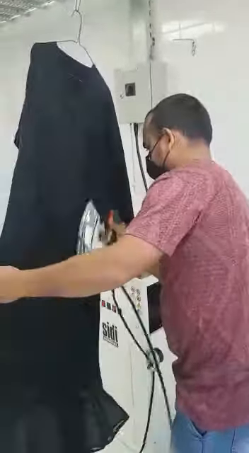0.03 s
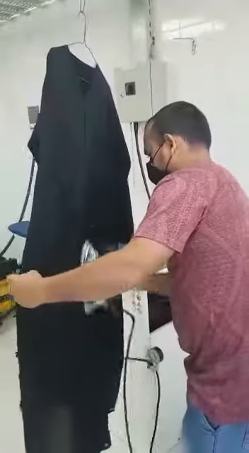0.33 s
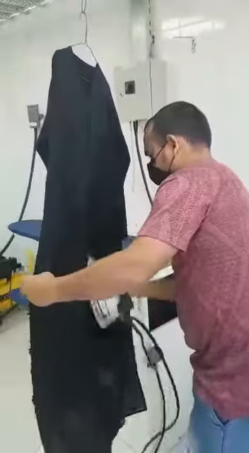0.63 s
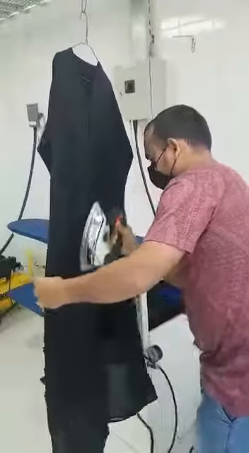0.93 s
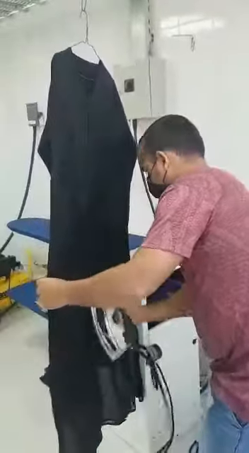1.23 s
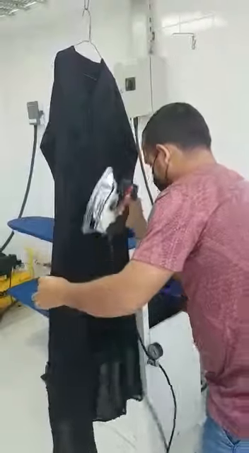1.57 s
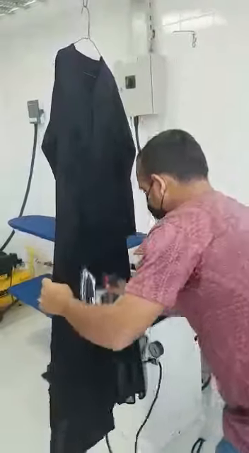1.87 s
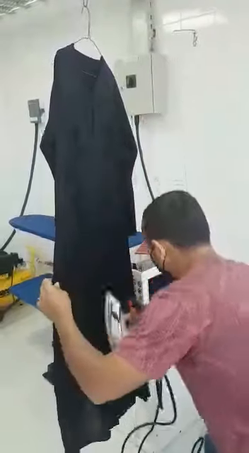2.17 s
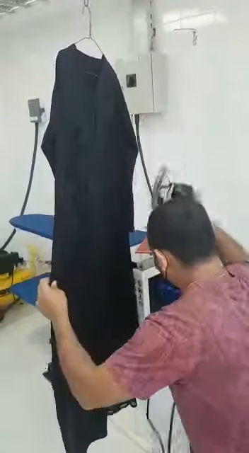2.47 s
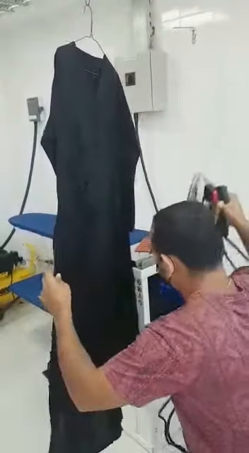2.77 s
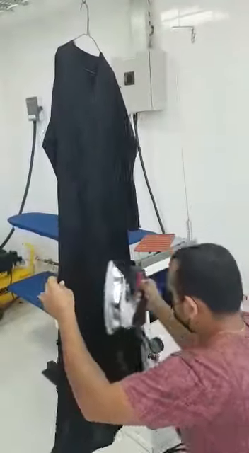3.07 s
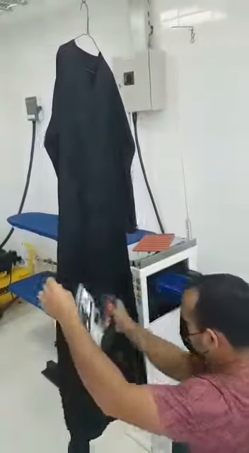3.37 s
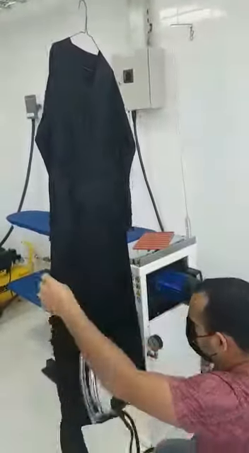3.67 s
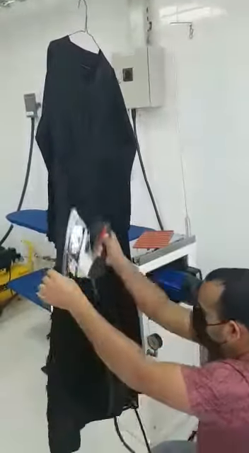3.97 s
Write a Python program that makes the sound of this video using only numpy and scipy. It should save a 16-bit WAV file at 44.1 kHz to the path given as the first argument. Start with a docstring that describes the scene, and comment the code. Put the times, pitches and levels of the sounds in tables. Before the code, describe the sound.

A steam iron hisses loudly, stops briefly, then spits and hisses again.

```python
"""Steam iron on a hanging dress

An iron is swept over a dress in a hard-walled laundry room. Turbulent steam hisses from the soleplate,
rushes through the cloth and drums where the sole presses in. The valve shuts with a low boom, leaving
the room's tail, a slight leak and a machine's hum. After a faint puff and a click the steam spits out
again, and a breathy whistle joins it."""
import sys
import numpy as np
from scipy import signal
from scipy.fft import rfft, irfft, next_fast_len
from scipy.io import wavfile
from scipy.ndimage import uniform_filter1d, map_coordinates

SR = 44100
rng = np.random.default_rng(int(sys.argv[2]) if len(sys.argv) > 2 else 0)


def unload_audio(sound):
    """Save the sound as a 16-bit wav file, at the path given as the first command line argument."""
    columns = np.transpose(np.atleast_2d(sound))
    # keep every value between -1 and 1, then stretch to whole-number steps
    steps = np.round(np.clip(columns, -1, 1) * 32767)
    wavfile.write(sys.argv[1], SR, steps.astype(np.int16))


N = 176400
SHUT_S, OPEN_S, OPEN_RISE_S = 2.555, 3.182, 0.005  # the steam valve


def steam():
    """Turbulence radiates broadband noise: four bands, fed by one flow, share its flutter."""
    # One list per burst of steam. Each row: time in seconds, relative level in dB.
    jet_levels = [
        [(0.0, -32.5), (0.34, -33), (0.45, -34), (0.6, -31.5), (0.78, -33), (0.94, -31.5), (1.04, -34.5),
         (1.18, -34), (1.25, -32.5), (1.45, -34), (1.65, -29), (1.82, -31.5), (1.88, -34.5), (2.05, -34.5),
         (2.3, -32.5), (2.43, -30), (2.55, -31)],
        [(3.29, -31.5), (3.392, -33), (3.506, -34), (3.668, -29.5), (4.0, -31.5)],
    ]  # hiss of the jet
    rush_levels = [
        [(0.0, -30.5), (0.13, -34), (0.35, -27), (0.47, -39), (0.62, -30), (0.78, -32.5), (0.9, -29),
         (1.0, -34.5), (1.05, -29.5), (1.1, -36.5), (1.18, -36), (1.35, -29.5), (1.55, -30), (1.78, -30.5),
         (2.02, -39), (2.1, -32.5), (2.3, -30.5), (2.46, -30.5), (2.55, -26.5)],
        [(3.29, -32.5), (3.518, -40), (3.6, -32), (3.8, -30), (4.0, -30.5)],
    ]  # flow through the cloth
    body_levels = [
        [(0.0, -40.5), (0.37, -45.5), (0.43, -49), (0.505, -53), (0.525, -37.5), (0.68, -36.5), (0.78, -41.5),
         (0.9, -38.5), (1.2, -45), (1.41, -37), (1.8, -40), (1.95, -49.5), (2.05, -47), (2.09, -39),
         (2.46, -42), (2.55, -33.5)],
        [(3.29, -41.5), (3.36, -44.5), (3.49, -63), (3.55, -43.5), (3.64, -41.5), (4.0, -41)],
    ]  # low body of that flow
    sizzle_levels = [
        [(0.0, -47.5), (0.82, -48), (0.91, -44.5), (1.11, -51), (1.66, -44.5), (2.04, -51.5), (2.52, -43),
         (2.55, -48.5)],
        [(3.33, -49), (3.39, -48), (3.494, -43.5), (3.554, -46), (3.672, -43), (3.864, -42), (3.884, -41.5),
         (4.0, -45.5)],
    ]  # top of the hiss
    # Spectra of the bands. Each row: frequency in Hz, relative level in dB.
    jet_colour = [(400, -45), (1500, -12), (3000, 0.5), (4150, -1.2), (4800, -2), (5600, -0.5), (6500, -3),
                  (7100, -10), (8400, -13.5), (9100, -31), (15000, -47)]
    rush_colour = [(200, -70), (630, -16.5), (1020, -2.5), (1400, -3.5), (1900, -1.5), (2700, -1),
                   (3400, -7.5), (5000, -12.5), (9000, -33)]
    body_colour = [(90, -24), (200, -9), (330, -8), (500, -0.5), (700, 1.5), (1100, -2), (2500, -29)]
    sizzle_colour = [(4000, -14), (7500, 6.5), (9300, 0), (10700, -1.5), (12000, 1), (13800, 3.5),
                     (15100, -1.5), (15700, -12)]
    jet = amp(curve(jet_levels)) * noise(jet_colour, patchy_db=2.04)
    rush = amp(curve(rush_levels) + 0.5 + 0.43 * wobble(25)) * noise(rush_colour, patchy_db=2.5)
    body = amp(curve(body_levels) - 2 + 0.6 * wobble(31.13)) * noise(body_colour, patchy_db=3.5)
    sizzle = amp(curve(sizzle_levels) + 4 + 0.75 * wobble(60)) * noise(sizzle_colour, patchy_db=2.5)
    flutter = amp(0.37 * wobble(130))
    return soleplate(valve() * flutter * (jet + rush + body + sizzle))


def valve(bleed_db_per_s=220):
    """Flow decays exponentially when the valve shuts and returns almost at once when it opens."""
    t = clock()
    bleeding = amp(-bleed_db_per_s * np.maximum(t - SHUT_S, 0))
    opening = np.clip((t - OPEN_S) / OPEN_RISE_S, 0, 1)
    return np.maximum(bleeding, opening)


def soleplate(flow, drift_hz=61):
    """Cavity resonance: the steam holes colour the flow, their peaks drifting as cloth covers them."""
    # Resonances of the holes. Each row: frequency in Hz, width in Hz, boost in dB.
    holes = [(1360, 53, 7), (4100, 260, 1.7), (5230, 270, 5), (6340, 190, 4.5), (8430, 250, 8),
             (9960, 270, 5.5)]
    lowered = filtered(flow, lambda hz: boost(holes, hz + drift_hz))
    raised = filtered(flow, lambda hz: boost(holes, hz - drift_hz))
    share = (1 + np.tanh(2 * wobble(3.87))) / 2
    return lowered + share * (raised - lowered)


def spit():
    """Condensate sputters out as the valve opens: a burst of noise under random amplitude modulation."""
    # Spectrum of the spray. Each row: frequency in Hz, relative level in dB.
    colour = [(70, -26), (180, -14), (450, -4), (950, -2.5), (1900, 2.5), (3000, -3), (4100, 0), (6200, -1),
              (7200, -3), (12000, -2.5), (15100, -2.5), (15700, -25)]
    # Peaks and notches of the sole in free air. Each row: frequency in Hz, width in Hz, boost in dB.
    resonances = [(890, 70, 6), (1130, 100, 3), (1340, 130, -8), (1510, 80, 9), (4120, 180, 7),
                  (4950, 220, 6), (5730, 150, -9), (6120, 200, 5), (6700, 150, -13), (7170, 170, 4),
                  (11250, 450, 4.5)]
    spray = unit(filtered(noise(colour, patchy_db=3.5), lambda hz: boost(resonances, hz)))
    sputter = amp(1.5 * wobble(230))
    envelope = amp(-21) * burst(OPEN_S, OPEN_RISE_S, fall_after_s=0.018, db_per_s=210)
    return envelope * sputter * spray


def whistle():
    """Noise in a narrow resonance is heard as a breathy pitch when the sole meets the cloth again."""
    swell = amp(-35.5) * burst(3.486, rise_s=0.12, fall_after_s=0.25, db_per_s=53)
    return swell * narrowband(hz=1440, width_hz=120, channels=2)


def drumming():
    """Steam trapped between sole and cloth drives low resonant modes, hardest at each press."""
    # Modes of the trapped steam. Each row: frequency in Hz, width in Hz, relative level in dB.
    modes = [(148, 24, -2), (189, 14.3, 5), (281.7, 30, -6.5), (447, 113, -12)]
    # Presses into the cloth. Each row: time of the peak in seconds, length in seconds, level in dB.
    presses = [(.14, 0.17, -56), (0.554, 0.052, -37.5), (0.805, 0.053, -47), (0.947, 0.21, -46.5),
               (1.627, 0.23, -42.5), (2.116, 0.049, -44.5), (2.516, 0.06, -37.5), (2.665, 0.14, -46.5),
               (3.089, .025, -53), (3.26, 0.12, -44.5)]
    response = lambda hz: sum(amp(db) * resonance(hz, centre, width) for centre, width, db in modes)
    push = sum(amp(db) * np.exp(-2 * ((clock() - peak) / length) ** 2) for peak, length, db in presses)
    idle = amp(-55.5) * valve()
    return (push + idle) * unit(filtered(rng.standard_normal(N), response))


def trigger():
    """Two damped noise transients precede the steam: a faint puff, then the valve's click."""
    # Spectra of the two. Each row: frequency in Hz, relative level in dB.
    puff_colour = [(80, -22), (180, -11), (450, 1), (1100, 1.5), (2500, -5), (4000, -9.5), (5500, -18),
                   (8000, -9), (9500, -20), (15000, -23)]
    click_colour = [(300, -25), (2500, -8), (4000, -2), (7000, -7), (15000, -4)]
    puff = amp(-49) * burst(3.041, rise_s=0.024, fall_after_s=0.024, db_per_s=260)
    click = amp(-38) * burst(3.171, rise_s=0.00091, fall_after_s=0.0017, db_per_s=800)
    return puff * noise(puff_colour, patchy_db=0.5) + click * noise(click_colour, patchy_db=2)


def leak():
    """The last steam seeps from the shut iron, its flow noise swelling and decaying exponentially."""
    # Spectrum of the seepage. Each row: frequency in Hz, relative level in dB.
    colour = [(500, -7), (2500, 5), (4000, 0), (5500, -4), (8400, -6), (9300, -13), (15000, -8)]
    envelope = amp(-57.5) * burst(2.636, rise_s=0.17, fall_after_s=0.17, db_per_s=60)
    return envelope * noise(colour, patchy_db=-0.5)


def room(source, positions=9):
    """Reverberation: each frequency decays at its own rate, and the echoes change as the iron moves."""
    # Decay between the bare walls. Each row: frequency in Hz, time to fall 60 dB in seconds.
    t60 = [(150, 0.4), (1000, 0.53), (4000, 0.45), (8000, 0.24), (14000, 0.12)]
    position = np.linspace(0, positions - 1, N)
    wet = np.zeros((2, N))
    for k in range(positions):
        hz, t, spectrum = signal.stft(rng.standard_normal((2, SR // 2)), SR, nperseg=256)
        decay = amp(-60 * t / along(t60, hz)[:, None])
        tail = signal.istft(spectrum * decay, SR, nperseg=256)[1]
        share = np.sqrt(np.maximum(1 - np.abs(position - k), 0))  # equal-power crossfade
        wet += signal.fftconvolve(source * share, tail / np.linalg.norm(tail[0]), axes=1)[:, :N]
    return wet


def background(hum_hz=104.3):
    """Room noise, a machine's narrowband hum and, at shut-off, a phase-modulated boom at its pitch."""
    # Spectrum of the room noise. Each row: frequency in Hz, relative level in dB.
    colour = [(25, 0), (50, -3), (70, -3), (110, 3), (185, 8), (350, -6), (1000, -11), (3000, -20),
              (6000, -29), (9000, -30), (15000, -28)]
    hum = amp(-61.5) * narrowband(hum_hz, width_hz=8.5, channels=1)
    swell = amp(-41) * burst(2.52, rise_s=0.043, fall_after_s=0.043, db_per_s=67)
    boom = swell * np.sin(2 * np.pi * hum_hz * clock() + 0.8 * wobble(27.94))
    return hum + boom + amp(-57.5) * noise(colour, patchy_db=1.7)


def noise(colour, patchy_db):
    """Partly coherent stereo noise of rms 1, near mono in the bass, with drifting patches of gain."""
    # Likeness of left and right. Each row: frequency in Hz, correlation from 0 to 1.
    coherence = [(50, .98), (200, 0.9), (500, 0.88), (750, 1), (1100, 0.019), (15000, 0)]
    spectrum = signal.stft(rng.standard_normal((2, N)), nperseg=1024)[2]
    patches = uniform_filter1d(rng.standard_normal(spectrum.shape), size=4, axis=1)  # across frequency
    patches = uniform_filter1d(patches, size=12, axis=2)  # across time
    pair = signal.istft(spectrum * amp(patchy_db * unit(patches)), nperseg=1024)[1][:, :N]
    angle = lambda hz: np.arccos(np.clip(along(coherence, hz), -1, 1)) / 2
    response = lambda hz: amp(along(colour, hz)) * [np.cos(angle(hz)), np.sin(angle(hz))]
    mid, side = filtered(pair, response)
    return unit(np.array([mid + side, mid - side]))


def narrowband(hz, width_hz, channels):
    """White noise through one resonance, scaled to rms 1."""
    return unit(filtered(rng.standard_normal((channels, N)), lambda f: resonance(f, hz, width_hz)))


def resonance(hz, centre, width):
    """A Lorentzian peak of height 1, with its full width taken at half height."""
    return 1 / (1 + (2 * (hz - centre) / width) ** 2)


def boost(resonances, hz):
    """Gain of resonances in series: their decibels add."""
    return amp(sum(db * resonance(hz, centre, width) for centre, width, db in resonances))


def burst(start_s, rise_s, fall_after_s, db_per_s):
    """Linear attack, then exponential decay beginning fall_after_s after the start."""
    t = clock() - start_s
    return np.clip(t / rise_s, 0, 1) * amp(-db_per_s * np.maximum(t - fall_after_s, 0))


def filtered(x, response):
    """Linear filtering: the spectrum of x is multiplied by a function of frequency."""
    size = next_fast_len(N + SR // 2)
    return irfft(rfft(x, size) * response(np.fft.rfftfreq(size, 1 / SR)), size)[..., :N]


def wobble(knots_per_s):
    """Smooth random modulation: a spline through Gaussian values."""
    return map_coordinates(rng.standard_normal(2048), [clock() * knots_per_s], mode="mirror")


def curve(bursts):
    """Linear interpolation of the bursts' levels, one value per sample."""
    times, levels = np.transpose([row for rows in bursts for row in rows])
    return np.interp(clock(), times, levels)


def along(points, hz):
    """Interpolation on a logarithmic frequency axis."""
    frequencies, values = np.transpose(points)
    return np.interp(np.log(hz + 1), np.log(frequencies + 1), values)


def amp(db):
    """Decibels to amplitude ratio."""
    return 10 ** (np.asarray(db) / 20)


def unit(x):
    """Normalisation to rms 1."""
    return x / np.sqrt(np.mean(x ** 2) + 1e-20)


def clock():
    """The time of each sample in seconds."""
    return np.arange(N) / SR


def scene():
    """Direct and reverberant sound add; a level difference sets the iron mostly to the right."""
    # Stereo balance of the iron. Each row: frequency in Hz, left minus right in dB.
    balance = [(100, -8), (600, 0), (1000, -3.5), (2000, -5), (3400, -6), (4050, -11), (4900, -3),
               (6300, -4), (7800, -4), (9000, -1), (10300, 5.5), (12200, 0), (15000, -1.5)]
    iron = steam() + leak() + trigger() + spit() + whistle()
    in_room = iron + amp(-5.5) * room(iron)
    placed = filtered(in_room, lambda hz: amp(np.outer([1, -1], along(balance, hz)) / 2))
    return placed + drumming() + background()


def record(dry):
    """Band limiting: an ideal low-pass filter removes everything above 15750 Hz."""
    return filtered(dry, lambda hz: hz < 15750)


dry = scene()
out = record(dry)
unload_audio(out)
```